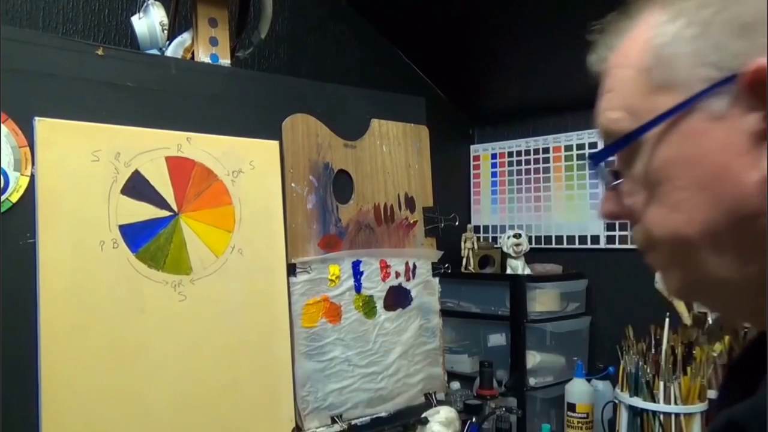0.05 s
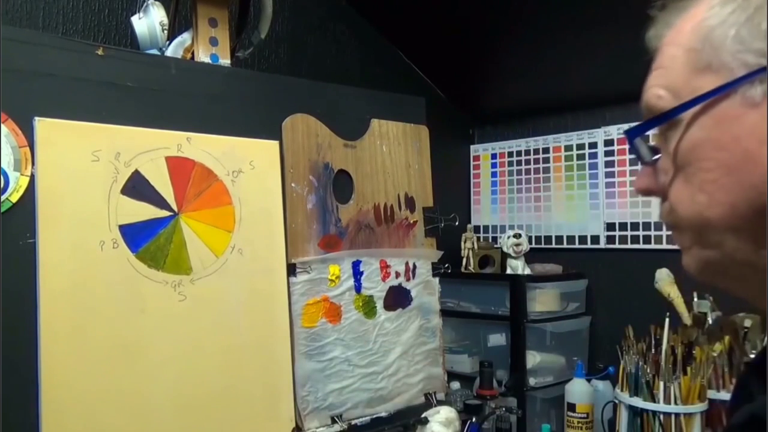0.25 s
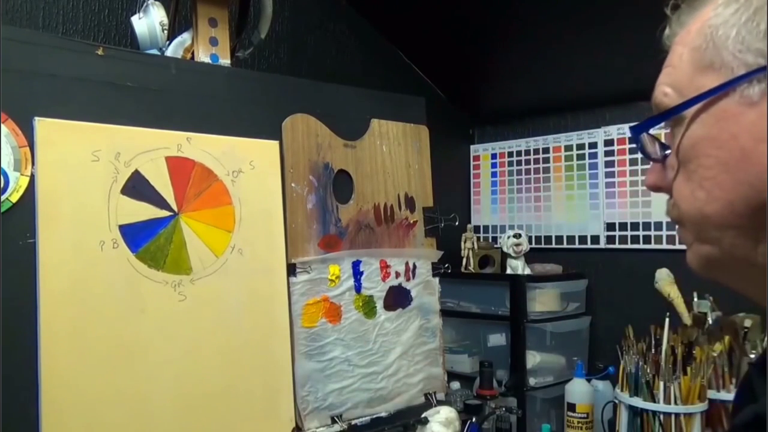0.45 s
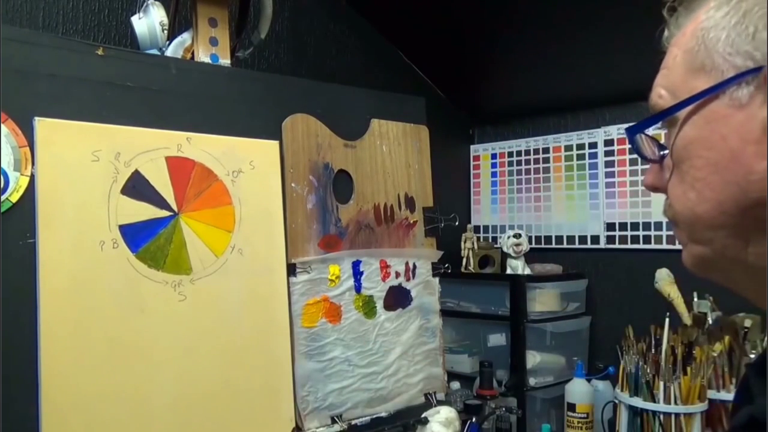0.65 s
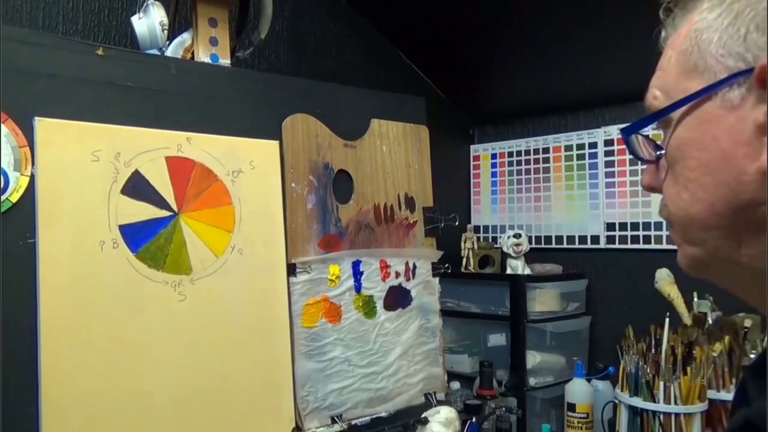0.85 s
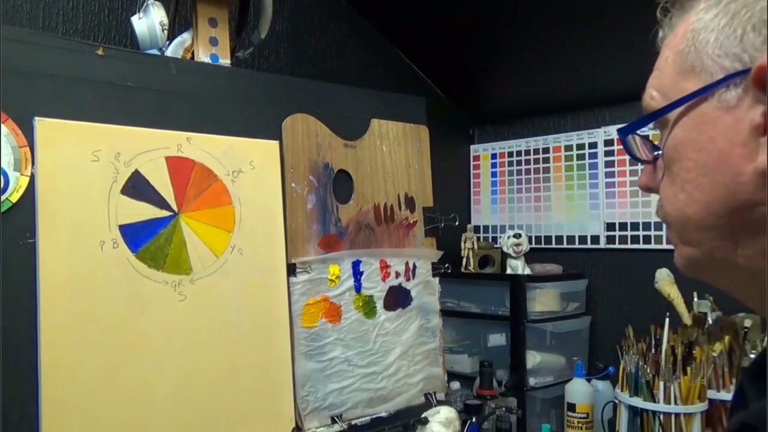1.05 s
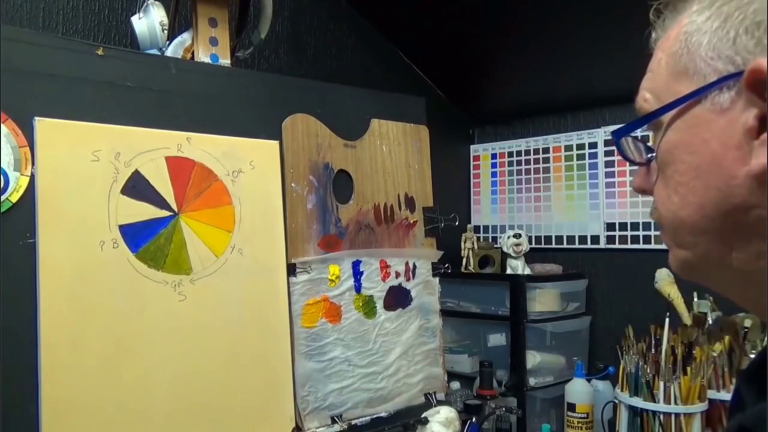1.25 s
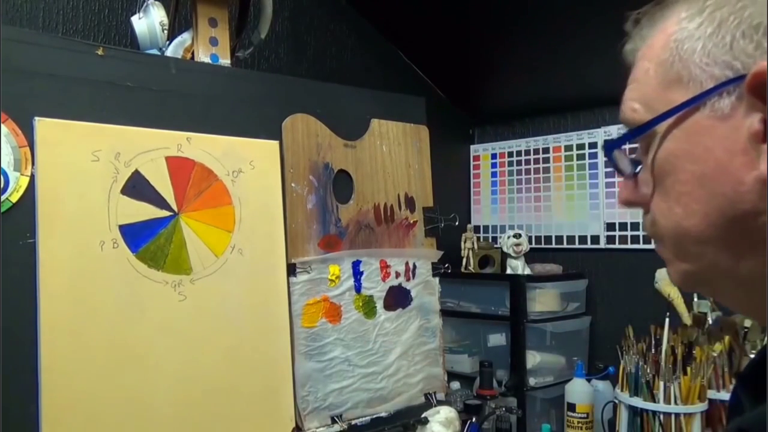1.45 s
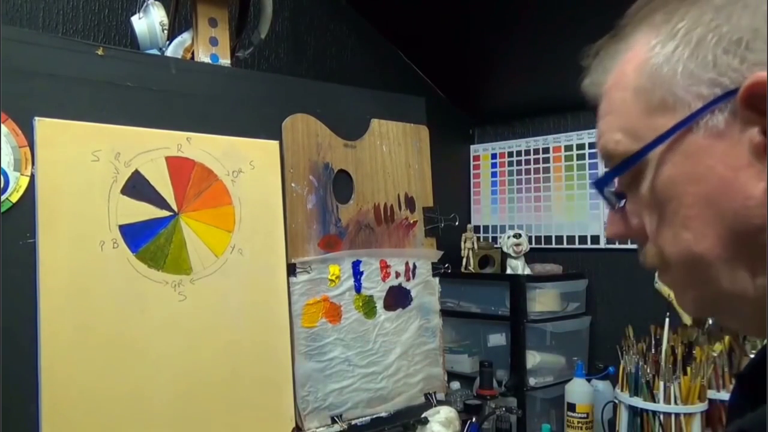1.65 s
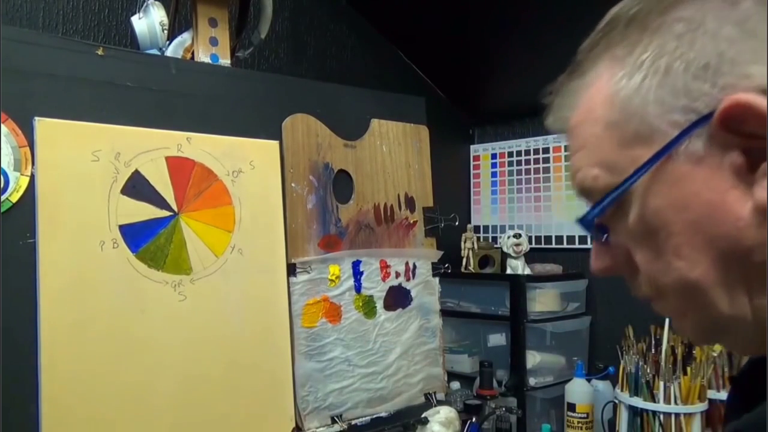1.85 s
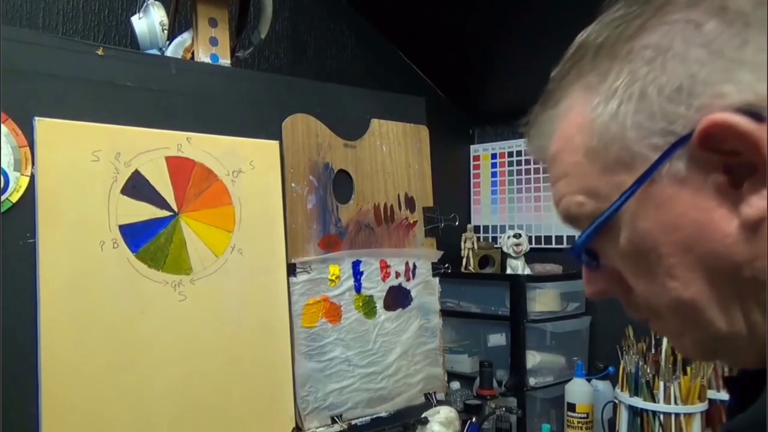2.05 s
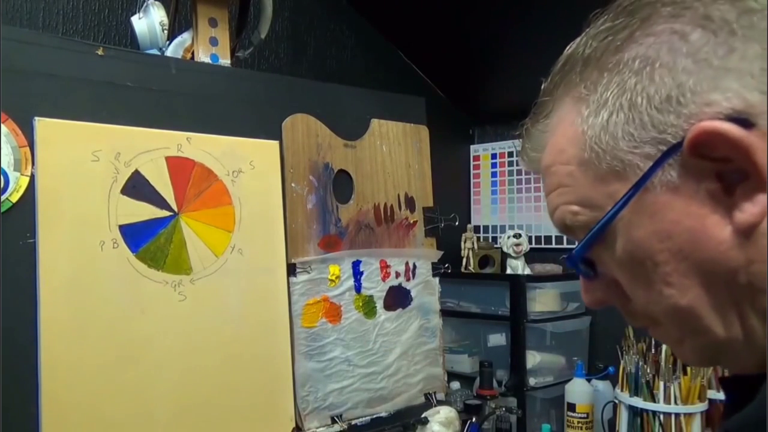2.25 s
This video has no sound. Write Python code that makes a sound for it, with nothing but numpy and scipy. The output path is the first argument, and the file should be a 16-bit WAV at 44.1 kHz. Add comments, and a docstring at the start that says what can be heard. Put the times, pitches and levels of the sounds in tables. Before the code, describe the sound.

Brush being rinsed in a water jar, quick bubbly sloshes and handle taps, quiet studio

```python
"""A paintbrush is swished to and fro in a jar of water, slightly to the right, in a quiet studio.
Strokes trap bubbles (damped, rising sines with a froth) and stir up slosh, spray and gurgle (noise, small bubbles).
Spray slaps are dying noise bands; knocks of the handle on the jar are ticks with noise bursts.
Jar resonances colour bubbles, knocks, slosh and gurgle; a short room tail answers.
A fan hisses and whines faintly behind (shaped noise, wavering sines)."""
import sys
import numpy as np
from scipy import signal
from scipy.fft import rfft, irfft, next_fast_len
from scipy.io import wavfile
from scipy.ndimage import map_coordinates

SR = 44100
rng = np.random.default_rng(int(sys.argv[2]) if len(sys.argv) > 2 else 0)


def volts_from_decibels(level):
    """Turn decibel levels (scalar or array-like) into linear amplitude factors."""
    exponent = np.asarray(level, float) / 20
    return 10 ** exponent


def persist_wave(psi):
    """Save psi, clipped to +-1, as 16-bit WAV."""
    counts = np.round(np.clip(psi, -1, 1) * 32767).astype(np.int16)
    wavfile.write(sys.argv[1], SR, np.atleast_2d(counts).T)


N = 101429


def unit(x):
    """Scaled to rms 1."""
    return x / np.sqrt(np.mean(x ** 2) + 1e-20)


def along(points, hz):
    """Interpolates (f/Hz, value) points on a log frequency axis."""
    f, v = np.transpose(points)
    return np.interp(np.log(hz + 1), np.log(f + 1), v)


def filtered(x, response):
    """x through a complex response of frequency."""
    n = x.shape[-1]
    m = next_fast_len(n + 8192)
    return irfft(rfft(x, m) * response(np.fft.rfftfreq(m, 1 / SR)), m)[..., :n]


def bell(hz, centre_hz, octaves):
    """Gaussian band on an octave axis."""
    return np.exp(-0.5 * (np.log2((hz + 1) / centre_hz) / octaves) ** 2)


def wobble(knots_per_s):
    """Smooth random curve through normal knots."""
    knots = rng.standard_normal(int(N * knots_per_s / SR) + 4)
    return map_coordinates(knots, [np.arange(N) * knots_per_s / SR])


def place(s, rows):
    """Sums rows of samples, each from its own start time."""
    at = np.round(np.asarray(s) * SR).astype(int)[:, None] + np.arange(rows.shape[1])
    return np.bincount(at.ravel(), rows.ravel(), N + SR)[:N]


BUBBLE_RISE = 0.09  # fractional pitch climb over a t60
BUBBLE_ATTACK_AT_2KHZ_S = 0.0013  # inversely as pitch


def plips(s, db, hz, t60, size):
    """Bubbles ringing: damped sines with a soft start and a rising pitch."""
    t = np.arange(size) / SR
    db, hz, t60 = np.array([db, hz, t60 + 1e-4])[..., None]
    turns = hz * (t + BUBBLE_RISE * t * np.minimum(t, t60) / (2 * t60))
    attack = 1 - np.exp(-t * hz / 2000 / BUBBLE_ATTACK_AT_2KHZ_S)
    return place(s, volts_from_decibels(db - 60 * t / t60) * attack * np.sin(2 * np.pi * turns))


# clear bubbles: t/s, relative level/dB, starting f/Hz, t60/s, froth level re bubble/dB
BUBBLES = [(0.112, -31, 485, 0.077, -27), (0.148, -24, 633, 0.041, -1), (0.16, -26, 692, 0.057, -15),
           (0.412, -25, 1058, 0.046, -20), (0.561, -17.5, 934, 0.032, -11),
           (0.633, -21.5, 860.5, 0.077, -3.5), (0.725, -49, 972, 0.035, 6), (0.804, -20.5, 817, 0.031, 1),
           (0.879, -19.5, 900, 0.016, 6.5), (0.948, -32, 614, 0.071, -6), (1.015, -27.5, 587, 0.052, -26),
           (1.035, -29.5, 807, 0.054, 5), (1.113, -31, 800, 0.058, 2), (1.119, -28, 598, 0.078, -16),
           (1.138, -23, 796, 0.043, -2), (1.203, -14.5, 820, 0.03, -35), (1.287, -30, 588, 0.069, -18),
           (1.292, -28, 1040, 0.032, -9), (1.4, -24, 510, 0.049, -6), (1.41, -21, 835, 0.054, -10),
           (1.461, -12, 800, 0.021, 2.5), (1.461, -27, 595, 0.051, -12), (1.475, -26, 785, 0.054, 0),
           (1.495, -32, 602, 0.049, -21), (1.528, -33, 605, 0.085, -20), (1.628, -36.5, 604, 0.072, -12),
           (0.1471, -33.5, 1470, 0.052, 7.5), (0.2199, -52, 1025, 0.051, 11),
           (0.3043, -28, 1400, 0.031, -13), (0.3571, -48.5, 1314, 0.11, 13.5),
           (0.3731, -18.5, 1345, 0.074, -6), (0.4823, -32, 1400, 0.031, 6), (0.5522, -16, 1357, 0.029, -36),
           (0.6175, -21, 1375, 0.032, -3), (0.633, -12, 1334, 0.019, -17), (0.732, -26, 2240, 0.047, -21),
           (0.7223, -20.5, 1137, 0.04, -5.5), (0.8036, -34, 1410, 0.043, -16),
           (0.8834, -22, 1230, 0.019, -5), (0.9493, -30, 1430, 0.092, -21), (1.0032, -24, 1330, 0.023, 9),
           (1.1059, -37.5, 1220, 0.051, 10.5), (1.1204, -25.5, 1395, 0.041, 5),
           (1.2316, -24, 1390, 0.017, 9.5), (1.291, -47, 1200, 0.018, -8), (1.3653, -36, 1450, 0.061, -19),
           (1.4067, -27.5, 1348, 0.1, 5), (1.4611, -24, 1410, 0.055, -23), (1.526, -32.5, 1314, 0.037, 1),
           (1.6193, -31.5, 1348, 0.1, -8), (1.6961, -27, 1340, 0.021, -18), (0.1935, -37, 2170, 0.035, 2),
           (0.2209, -20.5, 2190, 0.042, -21), (0.3018, -26, 2815, 0.032, 2), (0.3716, -32, 2010, 0.02, 6),
           (0.398, -22.5, 1996, 0.042, -3), (0.424, -24, 2034, 0.035, -1), (0.461, -18, 2400, 0.032, -3),
           (0.469, -17.5, 2570, 0.026, -14), (0.5547, -15, 1972, 0.018, 9), (0.618, -30, 3280, 0.027, -10),
           (0.633, -31.5, 2516, 0.05, 5), (0.7238, -13.5, 2182, 0.038, -8),
           (0.7722, -28.5, 2290, 0.017, 5.5), (0.8824, -39, 2460, 0.015, 11),
           (0.9109, -23, 2490, 0.0096, 11.5), (0.9583, -5, 3420, 0.0067, -20),
           (1.0266, -28.5, 3170, 0.046, -4), (1.1104, -29, 2080, 0.034, -3), (1.1399, -17, 1913, 0.02, 1),
           (1.1892, -27, 2390, 0.044, -10), (1.2292, -36, 3370, 0.01, 6), (1.2885, -26, 2200, 0.053, 3.5),
           (1.3459, -26, 2200, 0.021, 0), (1.3643, -26.5, 2230, 0.015, 8.5), (1.4045, -8, 2182, 0.024, -18),
           (1.5584, -20.5, 2230, 0.021, -15), (1.6213, -21, 2056, 0.049, -8), (0.49, -32, 2300, 0.02, -8),
           (0.565, -27, 2020, 0.025, -14), (0.574, -22.5, 2110, 0.03, -17), (0.602, -30, 2090, 0.037, -5),
           (0.713, -24, 2032, 0.041, 4), (0.982, -24.5, 1670, 0.016, 7.5), (1.377, -28.5, 2080, 0.036, -12),
           (1.435, -28, 2200, 0.025, -6), (1.452, -20.5, 2190, 0.032, -19), (1.456, -23.5, 3150, 0.027, -6),
           (1.419, -36, 1395, 0.015, -11), (0.95, -32, 2090, 0.032, -14), (0.915, -32, 607, 0.076, -23),
           (.638, -23, 3080, 0.032, -2.5), (1.376, -24, 5150, 0.023, -10), (2.075, -47.5, 3030, 0.083, -12)]
BUBBLE_DB = -5.5
FROTH_COUNT, FROTH_SPAN_S, FROTH_OCTAVES, FROTH_LIFE = 7, 0.025, 0.1, 0.45  # life: share of t60


def bubbles():
    """Clear bubbles, each with a froth of shorter ones near it in time and pitch."""
    s, db, hz, t60, froth_db = np.transpose(BUBBLES)[..., None]
    db = db + BUBBLE_DB
    u = rng.random((len(s), FROTH_COUNT))
    level_g, pitch_g = rng.standard_normal((2, len(s), FROTH_COUNT))
    late = FROTH_SPAN_S * u ** 2
    froth_level = db + froth_db + 3 * level_g - 250 * late  # later ones weaker
    froth_hz = hz * 2 ** (FROTH_OCTAVES * pitch_g)
    froth = [s + late, froth_level, froth_hz, FROTH_LIFE * t60 + 0 * u]
    clear = plips(*[c.ravel() for c in (s, db, hz, t60)], size=5000)
    return clear + plips(*[c.ravel() for c in froth], size=3000)


def swarm(hz, octaves, cycles, spread_db, count, size):
    """Many random small bubbles, each down 17 dB after the given cycles; rms 1."""
    u = rng.random(count)
    level_g, pitch_g = rng.standard_normal((2, count))
    pitch_hz = np.clip(hz * 2 ** (octaves * pitch_g), 500, 12000)
    t60 = np.log(1000) * cycles / pitch_hz / 2
    return unit(plips(u * N / SR, spread_db * level_g, pitch_hz, t60, size))


def wash(spectrum):
    """Noise shaped by (f/Hz, level/dB) points, rms 1."""
    return unit(filtered(rng.standard_normal(N), lambda hz: volts_from_decibels(along(spectrum, hz))))


# brush strokes: t/s, relative slosh level/dB, spray level/dB, relative gurgle level/dB
STROKES = [(0.15, -62, -52.5, -29.5), (0.22, -24, -55, -35), (0.3002, -33, -46, -72),
           (0.376, -28, -45, -39), (0.402, -22, -36, -31), (0.4683, -23, -40, -37),
           (0.489, -20.5, -65, -40), (0.551, -40, -47, -54), (0.619, -22.5, -69, -31),
           (0.7093, -18, -41, -41), (0.7954, -29, -43, -43), (0.8795, -19, -46, -30.5),
           (0.91, -30.5, -62, -47), (0.9562, -18, -34.5, -27.5), (1.007, -40, -46, -32),
           (1.0478, -48, -41, -46), (1.109, -28, -47, -26), (1.1358, -17, -50, -32.5),
           (1.193, -23.5, -37, -30), (1.2296, -17, -31.5, -38), (1.284, -15.5, -47, -57),
           (1.367, -23, -43, -31), (1.4007, -14, -34, -51), (1.4534, -24, -35, -27),
           (1.522, -20.5, -48, -32), (1.6128, -17, -42, -46), (1.692, -26.5, -73, -64)]
# churn left between strokes: t/s, slosh level/dB, spray level/dB
CHURN = [(0.051, -81, -82), (0.204, -52.5, -88), (0.354, -53.5, -51.5), (0.548, -44.5, -66),
         (0.704, -46.5, -61), (1.18, -44, -58.5), (1.33, -43, -55.5), (1.498, -46, -50),
         (1.718, -50.5, -61.5), (1.9, -66.5, -71)]
# slosh noise spectrum: f/Hz, relative density/dB
SLOSH_SPECTRUM = [(530, -53), (900, 7), (1230, 7.5), (1820, -27), (2160, 11.5), (3830, -5.5), (5000, -16),
                  (6500, -37), (11000, -120)]
# spray noise spectrum: f/Hz, relative density/dB
SPRAY_SPECTRUM = [(1760, -17), (3000, 19.5), (3440, 16), (5720, -21.5), (10300, 7.5), (11200, -14),
                  (14600, -36), (22000, -120)]
STROKE_SLOSH_DB, STROKE_GURGLE_DB, CHURN_GURGLE_DB = -16, -13.5, -16.5  # last: re churn slosh
SWELL_S, FADE_S = 0.0089, 0.012  # linear rise, exponential time constant
SLOSH_NOISE_DB, SLOSH_BUBBLES_DB, SPRAY_NOISE_DB, FIZZ_DB = 1.5, 3.5, -4, -3  # mix before rms 1


def stirring():
    """Slosh, spray and gurgle: noise and small bubbles, swelling and fading with each stroke."""
    t = np.arange(N) / SR
    s, slosh_db, spray_db = np.transpose(CHURN)
    churn_db = (slosh_db, spray_db, slosh_db + CHURN_GURGLE_DB)
    gain = volts_from_decibels([np.interp(t, s, c, -80, -80) for c in churn_db])
    for start, slosh_db, spray_db, gurgle_db in STROKES:
        swell = np.clip((t - start) / SWELL_S, 0, 1)
        shape = swell * np.exp(-np.maximum(t - start - SWELL_S, 0) / FADE_S)
        peak = volts_from_decibels([[slosh_db + STROKE_SLOSH_DB], [spray_db], [gurgle_db + STROKE_GURGLE_DB]])
        gain = np.hypot(gain, peak * shape)
    small = swarm(2023, 0.503, cycles=8, spread_db=5, count=3000, size=800)
    slosh = volts_from_decibels(SLOSH_NOISE_DB) * wash(SLOSH_SPECTRUM) + volts_from_decibels(SLOSH_BUBBLES_DB) * small
    fizz = swarm(6080, 0.718, cycles=10, spread_db=5, count=2500, size=300)
    spray = volts_from_decibels(SPRAY_NOISE_DB) * wash(SPRAY_SPECTRUM) + volts_from_decibels(FIZZ_DB) * fizz
    gurgle = swarm(800, 0.37, cycles=4.7, spread_db=4, count=700, size=2000)
    surge = volts_from_decibels(1.5 * np.array([wobble(40) for _ in gain]))
    layers = [unit(filtered(slosh, jar)), unit(spray), unit(filtered(gurgle, jar))]
    return (gain * surge * layers).sum(axis=0)


# spray slaps: t/s, relative level/dB, centre f/Hz, t60/s
SLAPS = [(0.1455, -25, 8600, 0.049), (0.2207, -17, 3930, 0.016), (0.2968, -17.5, 6270, 0.04),
         (0.411, -30, 4300, 0.016), (0.4574, -18, 9200, 0.033), (0.488, -36, 4500, 0.025),
         (0.713, -33, 4100, 0.065), (0.764, -34, 4040, 0.051), (0.79, -21.5, 4400, 0.047),
         (0.798, -31, 6050, 0.027), (0.909, -21.5, 3640, 0.045), (1.028, -41, 3300, 0.023),
         (0.8566, -27.5, 4700, 0.094), (0.882, -24, 4150, 0.034), (0.9468, -14, 4150, 0.027),
         (0.957, -12.5, 5100, 0.022), (1.056, -17, 7900, 0.031), (1.132, -5, 6800, 0.018),
         (1.1394, 4, 10400, 0.014), (1.21, -14, 10200, 0.021), (1.2283, -8.5, 4130, 0.018),
         (1.2393, -17, 4250, 0.016), (1.3093, -24, 5150, 0.04), (1.4042, -3.5, 8300, 0.017),
         (1.455, -15, 5840, 0.032), (1.5411, -22, 6350, 0.026), (1.626, -20, 6400, 0.031),
         (1.79, -34, 9400, 0.027)]
SLAP_DB, SLAP_SKIRT_DB, SLAP_OCTAVES, SLAP_ATTACK_S = -15, -10, 0.25, 0.0007


def slaps():
    """Bursts of spray: dying noise around a centre, on a broad skirt cut below 3 kHz."""
    t = np.arange(4000) / SR
    s, db, centre_hz, t60 = np.transpose(SLAPS)[..., None]

    def band(hz):
        low_cut = 1 + (3000 / (hz + 1)) ** 4
        return (bell(hz, centre_hz, SLAP_OCTAVES) + volts_from_decibels(SLAP_SKIRT_DB)) / low_cut

    noise = filtered(rng.standard_normal((len(SLAPS), len(t))), band)
    noise /= noise.std(axis=1, keepdims=True)
    decay = volts_from_decibels(db + SLAP_DB - 60 * t / (t60 + 1e-4))
    return place(s[:, 0], noise * decay * (1 - np.exp(-t / SLAP_ATTACK_S)))


# handle knocks on the jar: t/s, relative level/dB
KNOCKS = [(0.2216, -10), (0.4123, -12), (0.4705, -20), (0.492, -22), (0.5572, -29), (0.639, -20.5),
          (0.958, -29), (1.1404, -18), (1.2289, -10.5), (1.2402, -23), (1.4053, -4)]
KNOCK_DB, KNOCK_T60_S, KNOCK_HZ, KNOCK_OCTAVES = -19.5, 0.025, 2300, 0.59
TICK_DB, TICK_T60_S = 8.5, 0.0023  # level re burst


def knocks():
    """Handle on jar wall: one noise band with a sharp tick and a damped burst."""
    t = np.arange(4000) / SR
    s, db = np.transpose(KNOCKS)
    noise = rng.standard_normal((len(s), len(t)))
    noise = unit(filtered(noise, lambda hz: bell(hz, KNOCK_HZ, KNOCK_OCTAVES)))
    decay = volts_from_decibels(-60 * t / KNOCK_T60_S) + volts_from_decibels(TICK_DB - 60 * t / TICK_T60_S)
    return place(s, noise * volts_from_decibels(db[:, None] + KNOCK_DB) * decay)


# jar resonances: f/Hz, width/Hz, relative level/dB
JAR = [(604, 30, 3), (1222, 40, -3), (1360, 40, 1), (2012, 30, 3), (2122, 45, 4), (3500, 90, 5)]
JAR_DB = -5


def jar(f):
    """Jar response: second-order resonances over a flat path."""
    modes = sum(volts_from_decibels(db) * 1j * f * w / (c * c - f * f + 1j * f * w) for c, w, db in JAR)
    return 1 + volts_from_decibels(JAR_DB) * modes


# room decay: f/Hz, t60/s
ROOM = [(300, 0.26), (1500, 0.12), (4000, 0.18), (10000, 0.12)]
ROOM_DB, WALL_DELAY_S, ROOM_ALIKE = -4.5, 0.004, 0.5  # alike: left-right correlation of tail


def room(x):
    """Short noise tail with a decay set by frequency; drawn anew every tenth of a second."""
    out, step, turn = np.zeros((2, N + SR)), SR // 10, np.arccos(ROOM_ALIKE) / 2
    for at in range(0, N, step):
        hz, t, z = signal.stft(rng.standard_normal((2, SR // 3)), SR, nperseg=256)
        decay = volts_from_decibels(-60 * t / along(ROOM, hz)[:, None])
        a, b = signal.istft(z * decay, SR, nperseg=256)[1]
        tail = np.cos(turn) * a + np.sin(turn) * np.array([b, -b])
        wet = signal.fftconvolve(x[None, at:at + step], tail / np.linalg.norm(a), axes=1)
        out[:, at + round(WALL_DELAY_S * SR):][:, :wet.shape[1]] += wet
    return out[:, :N]


# fan hiss spectrum: f/Hz, relative density/dB
HISS_SPECTRUM = [(15, -45), (25, -42), (100, -17), (150, -10.5), (313, -3), (472, -6.5), (579, -10),
                 (916, -1), (1150, -8), (1250, -4.5), (1740, -7), (2080, -10.5), (3040, -13.5), (5210, -18),
                 (10400, -17), (11200, -21.5), (14600, -85), (22000, -120)]
# hiss left-right correlation: f/Hz, correlation
HISS_ALIKE = [(60, 0.89), (220, 0.88), (830, 0.63), (3110, 0.35), (11600, 1)]
# fan tones: f/Hz, rms level/dB before wavering
WHINE = [(50, -85), (339.1, -73), (1163, -69), (1545, -64), (1723, -70)]
HISS_DB = -51.5


def fan():
    """Near-steady hiss, partly shared by both sides, with a few tones wavering in level and phase."""
    def split(hz):
        turn = np.arccos(np.clip(along(HISS_ALIKE, hz), -1, 1)) / 2
        return volts_from_decibels(along(HISS_SPECTRUM, hz)) * [np.cos(turn), np.sin(turn)]

    mid, side = filtered(rng.standard_normal((2, N)), split)
    hiss = volts_from_decibels(HISS_DB + 0.077 * wobble(4.9)) * unit(np.array([mid + side, mid - side]))
    t = np.arange(N) / SR
    tones = np.zeros(N)
    for hz, db in WHINE:
        level = np.sqrt(2) * volts_from_decibels(db + 4.3 * wobble(34.47))
        tones += level * np.sin(2 * np.pi * hz * t + 0.9 * wobble(12))
    return hiss + tones


def scene():
    """Water and jar sounds, stripped of bass as the jar radiates none; room tail and fan added."""
    wet = filtered(bubbles() + knocks(), jar) + slaps() + stirring()
    wet = signal.sosfilt(signal.butter(3, 350, "high", fs=SR, output="sos"), wet)
    return wet + volts_from_decibels(ROOM_DB) * room(wet) + fan()


def low_pass(x):
    """Removes everything above the highest recorded frequency."""
    return signal.sosfilt(signal.butter(12, 12180, fs=SR, output="sos"), x)


# microphone balance: f/Hz, left minus right level/dB
LEAN = [(60, -2.5), (170, -0.5), (490, -5), (1410, -2), (4040, -1.0), (11600, 0)]
TOP_HZ, ABOVE_TOP_DB = 11100, -31
NARROW_HZ, NARROW_DB = 6800, -1  # side level above NARROW_HZ


def record(dry):
    """Microphone pair: slightly stronger on the right, narrower in the treble, top cut."""
    def mic(hz):
        top_db = ABOVE_TOP_DB * (hz > TOP_HZ) - 30 * np.maximum(hz / TOP_HZ - 1, 0)
        return volts_from_decibels(along(LEAN, hz) * [[0.5], [-0.5]] + top_db)

    left, right = filtered(dry, mic)
    mid = (left + right) / 2
    side = filtered((left - right) / 2, lambda hz: volts_from_decibels(NARROW_DB * (hz > NARROW_HZ)))
    return low_pass(np.array([mid + side, mid - side]))


dry = scene()
out = record(dry)
persist_wave(out)
```